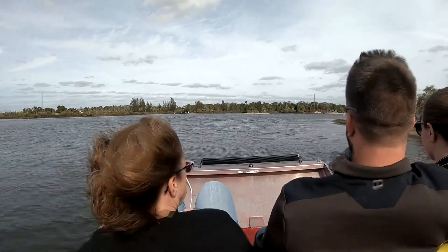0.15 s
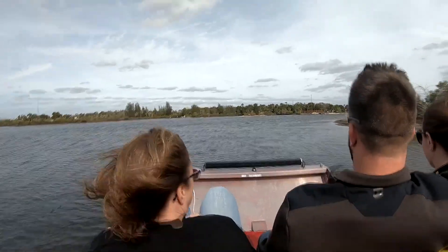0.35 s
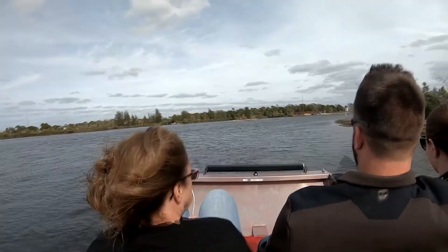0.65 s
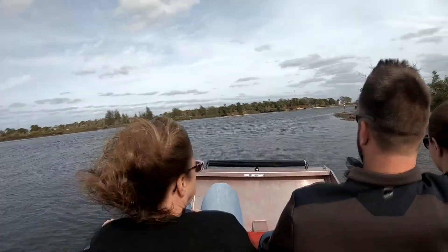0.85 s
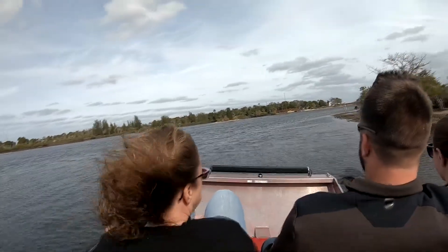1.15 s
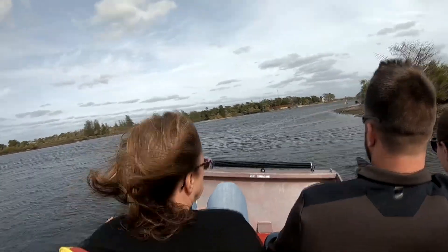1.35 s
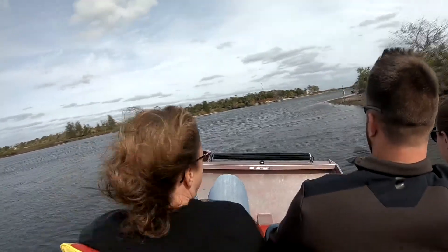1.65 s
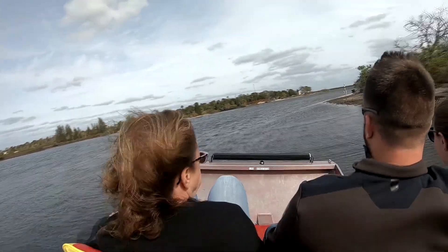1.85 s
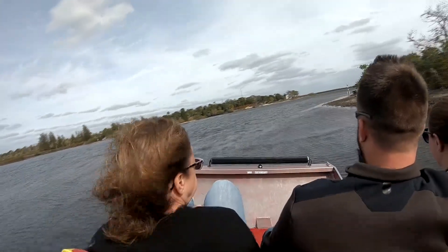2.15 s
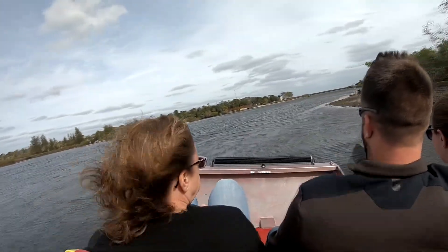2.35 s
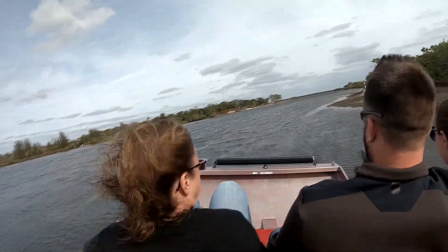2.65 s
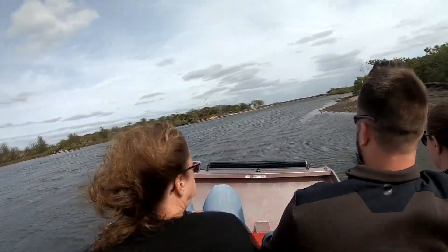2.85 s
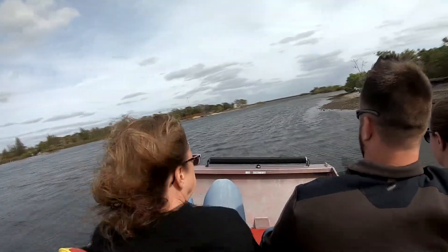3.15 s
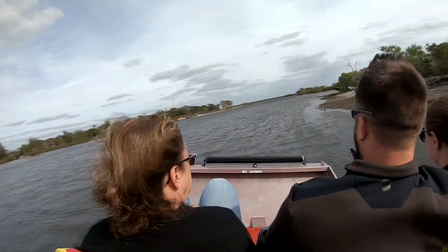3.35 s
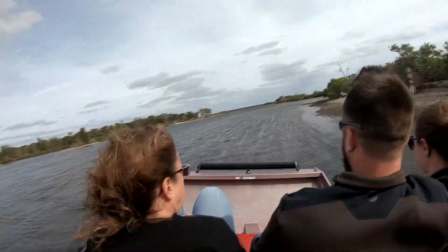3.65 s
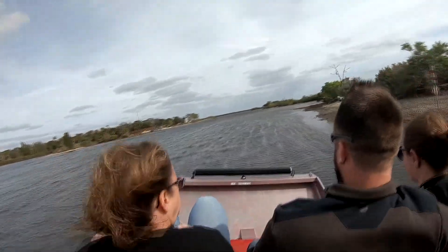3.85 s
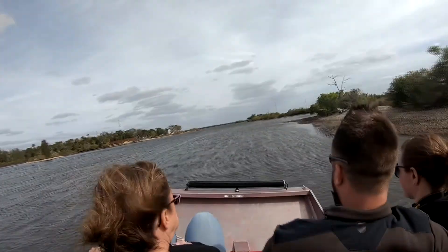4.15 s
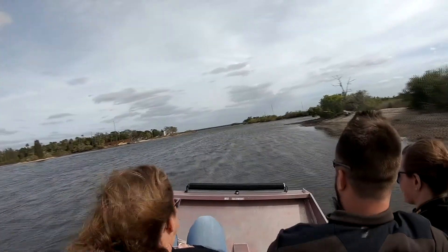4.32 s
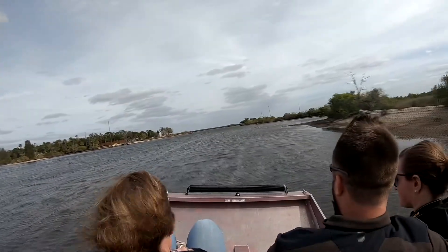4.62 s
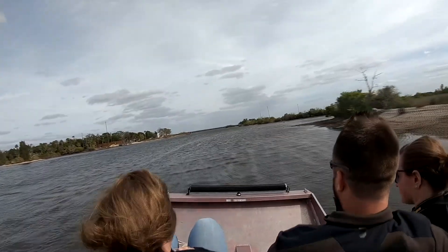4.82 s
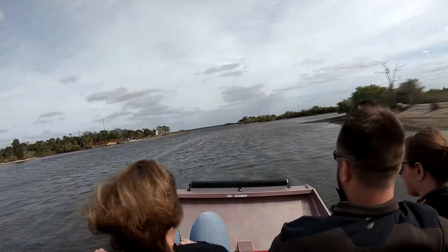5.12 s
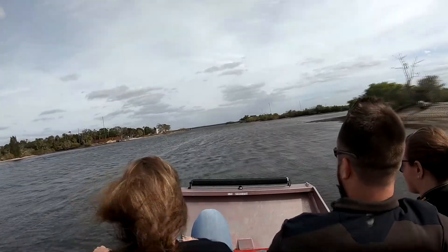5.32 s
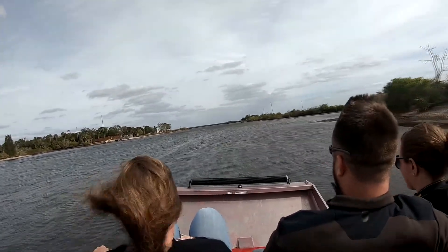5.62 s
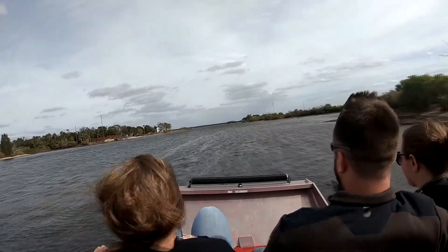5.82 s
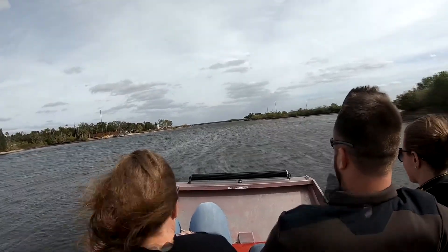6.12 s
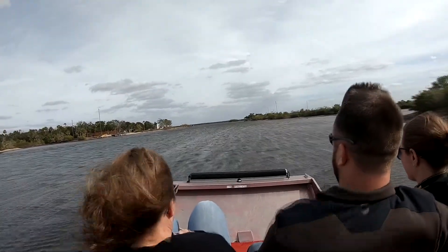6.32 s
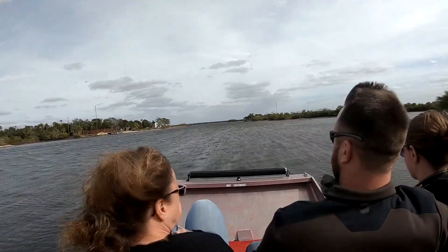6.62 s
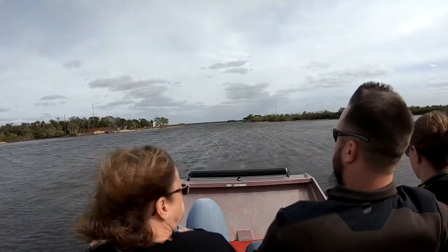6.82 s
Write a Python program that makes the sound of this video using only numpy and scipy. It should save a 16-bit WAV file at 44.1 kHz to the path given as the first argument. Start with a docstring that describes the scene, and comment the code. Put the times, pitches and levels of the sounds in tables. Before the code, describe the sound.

Aboard a moving airboat on open water, a loud, low propeller drone holds a nearly constant pitch, with a rough engine growl beating against it and a fast swishing hiss of air and spray. Wind thumps and crackles on the exposed microphone, heavy through the first four seconds, then mostly calmer, with a few late bursts.

```python
"""An airboat's propeller drones over open water, a periodic pulse train whose hiss swishes at each blade pass.
The V8 that drives it through a reduction adds a comb of exhaust lines that beats against the drone,
a faint accessory whine and a growl. Torn air and spray add a low roar and a hiss of shaped noise.
Head wind at the microphone is noise in three bands for three sizes of eddy, with gusts and short slaps.
A limiter ducks the hardest buffets."""
import sys
import numpy as np
from scipy import signal
from scipy.fft import rfft, irfft, next_fast_len
from scipy.io import wavfile
from scipy.ndimage import uniform_filter1d, minimum_filter1d

SR = 44100
rng = np.random.default_rng(int(sys.argv[2]) if len(sys.argv) > 2 else 0)


def digitize_waveform(pressure):
    """Quantize a signal to 16-bit integers and store it at the path in sys.argv[1].

    Rows of a 2-D input are taken as channels; values are limited to [-1, 1].
    """
    field = np.atleast_2d(pressure).T
    bounded = np.clip(field, -1, 1)
    quanta = np.round(bounded * 32767).astype(np.int16)
    wavfile.write(sys.argv[1], SR, quanta)


N = 307818
TIME = np.arange(N) / SR  # s

# speed of the propeller: start_s, blade_passes_hz
BLADE_RATE = [(0, 88.54), (0.5, 89), (0.9, 88.88), (1.2, 88.5), (1.55, 89.23), (1.9, 88.4), (2.25, 88.47),
              (2.7, 88.53), (3.15, 88.63), (3.55, 88.48), (4.2, 88.75), (4.65, 88.38), (5.2, 88.5),
              (5.55, 88.26), (6, 88.83), (6.5, 88.98), (6.9, 89.1)]
# head wind at the microphone: start_s, strength_db, brightness_db
HEAD_WIND = [(0, -22, -0.5), (.6, -20.5, 0), (.7, -28.5, -2), (.85, -24.5, -1.5), (1.5, -26, 1),
             (2.15, -25, 3), (2.28, -31, -3.5), (2.95, -30, -0.5), (3.3, -25, 1), (3.6, -24.5, 2.3),
             (3.95, -23, .5), (4.05, -37, 6), (4.85, -35, 1.5), (5.35, -30.5, 2.5), (6.33, -35, 3),
             (6.52, -22.5, -4.5), (6.98, -25.5, -4.5)]
CYCLES_PER_BLADE = .38185  # four-stroke engine cycles per blade pass, set by the reduction


def undb(db):
    """Decibels to amplitude ratio: 20 dB a decade."""
    return 10 ** (np.asarray(db) / 20)


def unit(x):
    """Normalise a signal to a standard deviation of 1."""
    return x / np.std(x)


def curves(table):
    """Linear interpolation in time of each column of a table after the first."""
    s, *columns = np.transpose(table)
    return [np.interp(TIME, s, column) for column in columns]


def walk(rate):
    """Low-passed random steps: a smooth chance curve of spread 1 that changes about rate times a second."""
    hold = max(int(SR / rate), 2)
    steps = np.repeat(rng.standard_normal(N // hold + 2), hold)
    smooth = uniform_filter1d(uniform_filter1d(steps, hold), hold)
    return unit(smooth[:N])


def noise(colour):
    """Spectral shaping of white noise to rms 1; colour lists hz, level_db, joined along log frequency."""
    hz, db = np.transpose(colour)
    size = next_fast_len(N)
    f = np.maximum(np.fft.rfftfreq(size, 1 / SR), 1)
    gain = undb(np.interp(np.log(f), np.log(hz), db))
    gain *= np.minimum(f / hz[0], 1) ** 2 * np.minimum(hz[-1] / f, 1) ** 8  # skirts beyond the end points
    shaped = irfft(rfft(rng.standard_normal(size)) * gain, size)
    return unit(shaped[:N])


def split(x, hz, order=2):
    """Complementary filtering: a zero-phase low-pass part and the remainder above it."""
    low = signal.sosfiltfilt(signal.butter(order, hz, fs=SR, output="sos"), x)
    return low, x - low


def eddies(rate, depth_db):
    """Turbulent amplitude modulation: a gain of rms 1 that flickers in decibels within bounds."""
    gain = undb(depth_db * np.tanh(.7 * walk(rate)))
    return gain / np.sqrt(np.mean(gain ** 2))


def tone(phase, waver_db, smear):
    """Propagation through turbulent air: a line of rms about 1, fluttering in level and phase (smear in rad)."""
    flutter = undb(waver_db * walk(11))
    return -np.sqrt(2) * flutter * np.cos(phase + smear * walk(13))


def airflow():
    """Superposition of energy: bell-shaped gusts add to the head wind for large, middling and small eddies."""
    # gusts that stand out of the wind: peak_s, length_s (standard deviation), strength_db,
    # brightness_db and rumble_db (small and large eddies relative to the strength)
    gust_rows = [(.15, 0.053, -26, -15, 0), (0.58, 0.048, -21.5, -7, 2), (1.009, 0.023, -17.5, -2, 0),
                 (1.268, 0.013, -19, 0, -1), (1.365, 0.024, -23, 6.5, 1), (1.814, 0.025, -25.5, 1, 4),
                 (1.95, 0.028, -24.5, 3, 2), (2.048, 0.039, -20, -6, -3), (2.437, .02, -22, 0.5, 2),
                 (2.686, 0.033, -19.5, -1.5, -1), (3.41, .03, -21.5, -1, 4), (3.785, .03, -21, -0.5, 5.5),
                 (3.847, 0.021, -25, 5.5, 5), (4.609, 0.023, -25.5, -3.5, 3), (5.445, .03, -19.5, -7, 2),
                 (5.61, 0.024, -25.5, -3, 4), (6.003, 0.02, -18, -1.5, -3), (6.122, .045, -22, -3, -11),
                 (6.5, 0.033, -17.5, -5.5, -6), (6.665, .02, -22, 0.5, -2)]
    unsteady_rate, unsteady_db = 18, 2.1  # the wind's own unsteadiness: changes per s, bound in dB
    wind_db, wind_bright_db = curves(HEAD_WIND)
    wind = undb(wind_db + unsteady_db * np.tanh(walk(unsteady_rate)))
    large, middling, small = wind, wind, wind * undb(wind_bright_db)
    for s, length, db, bright_db, rumble_db in gust_rows:
        swell = undb(db) * np.exp(-.5 * ((TIME - s) / length) ** 2)
        large = np.hypot(large, swell * undb(rumble_db))
        middling = np.hypot(middling, swell)
        small = np.hypot(small, swell * undb(bright_db))
    return large, middling, small


def gusts():
    """Turbulent pressure at the microphone: large eddies rumble, middling ones buffet, small ones flutter."""
    rumble_db, buffet_db, flutter_db = -1, 4, -6  # each against its eddies' strength
    large, middling, small = airflow()

    rumble = noise([(22, -19), (35, -7.0), (58, -0.5), (80, 2), (120, -16), (200, -38.5)])
    rumble = rumble * eddies(rate=16, depth_db=2.5)

    buffet = noise([(60, -26.0), (110, 3.5), (220, 1), (330, -5.5), (450, -13.5), (700, -29.5)])
    buffet = buffet * eddies(rate=25, depth_db=2.5)

    flutter = noise([(200, -10.5), (480, 2), (900, 0.0), (1400, -9.0), (2200, -14.5), (4000, -25.0),
                     (6300, -28.5)])
    ragged = eddies(rate=150, depth_db=6.0)
    # the flow tears at the port, so flutter outgrows the wind: 0.15 dB extra per dB above a -23 dB pivot
    tearing = (middling / undb(-23)) ** 0.15
    flutter = small * tearing * ragged * flutter

    return undb(rumble_db) * large * rumble + undb(buffet_db) * middling * buffet + undb(flutter_db) * flutter


def small_slaps():
    """Random arrivals: lesser eddies, one by chance in each equal interval, as hard as the wind is strong
    and bright; rows of peak_s, strength_db, length_s, crackle_db."""
    per_s, offset_db, scatter_db = 10, -3, 1.5  # level against the wind's strength and brightness
    wind_db, bright_db = curves(HEAD_WIND)
    count = int(per_s * N / SR)
    when, size = rng.random((count, 2)).T
    at = ((np.arange(count) + when) / count * (N - 1)).astype(int)
    db = wind_db[at] + bright_db[at] + offset_db + scatter_db * (2 * size - 1)
    return [(s, d, .005, -13) for s, d in zip(TIME[at], db)]


def slaps():
    """Impulsive loading: single eddies sweep over the microphone, a dull thud with a crackle on top."""
    # the hardest eddies: peak_s, strength_db, length_s, crackle_db (relative to the strength)
    hard_slaps = [(.024, -20.5, 0.0045, -3.5), (0.042, -23.5, 0.0073, -2.5), (0.112, -21.5, 0.0069, -12),
                  (0.228, -20, 0.0046, -12), (.257, -21.5, 0.0023, -0.5), (.333, -16, 0.0043, -9),
                  (0.365, -24.5, 0.0082, -6), (0.506, -17, 0.0049, -10), (.539, -15.5, 0.0044, -13),
                  (0.598, -23, 0.007, -13), (.83, -21.5, 0.0061, -10), (1.004, -24, .012, -8),
                  (1.17, -17, .005, -12), (1.187, -18, .005, -5), (1.412, -24, 0.0054, -1.5),
                  (1.598, -19.5, 0.0084, -11), (1.792, -21.5, .008, -11), (1.93, -24.5, .009, -4),
                  (2.474, -19, 0.0062, -11), (2.577, -16.5, 0.006, -20), (2.683, -20.5, .01, -20),
                  (2.742, -21, 0.01, -20), (3.415, -16.5, .0076, -14), (3.484, -20, .008, -7),
                  (3.508, -20.5, .009, -16), (3.602, -23.5, 0.012, -6.5), (3.64, -19, 0.014, -11.5),
                  (3.784, -24, 0.015, -10), (3.851, -24, 0.013, -12), (6.014, -17, .005, -17),
                  (6.657, -19, 0.0095, -30)]
    attack_share = .7  # the rise of a slap against its length
    thud = noise([(90, -10.0), (300, 4), (900, -4), (1500, -7.5), (2500, -33.5), (5000, -42.5)])
    fizz = noise([(800, -7), (2000, 2.5), (3500, -5.5), (6000, -11.5), (7500, -35.0)])
    force, crackle = np.zeros(N), np.zeros(N)
    for s, db, length, crackle_db in [*hard_slaps, *small_slaps()]:
        near = slice(max(int((s - 2 * length) * SR), 0), int((s + 3 * length) * SR))
        age = (TIME[near] - s) / length
        swell = undb(db) * np.exp(-(age / np.where(age < 0, attack_share, 1)) ** 2)
        force[near] += swell
        crackle[near] += swell * undb(crackle_db)
    return undb(0.5) * force * thud + undb(0.4) * crackle * fizz


def rush(blade):
    """Broadband flow noise of torn air and spray: a low roar, and a hiss modulated once per blade pass."""
    # hiss and spray: start_s, level_db, treble_db (the spray above 7 kHz, on top of the level)
    rush_levels = [(0, -3, -3.5), (.7, -4, -4), (1.05, 1.5, -4), (1.3, -1.5, -4), (1.9, -0.5, -3),
                   (2.7, 0.5, 2.5), (3.1, -0.1, 0.5), (3.45, 1.5, 1), (3.9, -4.5, -1.5), (4.15, -1, -3.5),
                   (4.5, -0.4, 1.5), (5.05, -1, 4.5), (5.45, -1, 6.5), (5.9, 0, 3.5), (6.25, -2, 2.5),
                   (6.6, .7, 0.5), (6.98, 1, 2)]
    # spectrum of the rush: hz, level_db
    rush_colour = [(30, -7), (120, 0), (210, 2.5), (330, -4.5), (500, -10.5), (900, -17), (1400, -22.5),
                   (2200, -22.5), (3000, -24.5), (3500, -20.5), (4300, -26), (5400, -26), (6300, -24.5),
                   (7000, -32), (8000, -42), (10000, -56.5)]
    level_db, treble_db = curves(rush_levels)
    roar, hiss = split(noise(rush_colour), hz=3320)
    hiss, top = split(hiss, hz=7000, order=4)

    blade_pulse = np.exp(5.8 * (np.cos(blade) - 1))  # peaks at 1 as each blade passes
    swish = 1 + blade_pulse * eddies(rate=90, depth_db=9.5)
    swish = swish / np.sqrt(np.mean(swish ** 2))

    spray = top * undb(treble_db) * eddies(rate=24, depth_db=3)
    roar = undb(-25.0) * roar * eddies(rate=14, depth_db=2.5)
    return roar + undb(level_db - 24.5) * (hiss * swish + spray)


def growl(cycle):
    """Periodicity gives harmonics: valves and pistons make the same rough rattle in every engine cycle."""
    # spectrum of the growl: hz, line_level_db
    growl_colour = [(100, -42), (340, -44), (500, -52), (900, -53), (1150, -57.5), (1400, -59), (2000, -64),
                    (3000, -71.5)]
    size = 2048  # samples of one cycle
    order = np.arange(1, 90)
    hz, db = np.transpose(growl_colour)
    line_hz = order * CYCLES_PER_BLADE * BLADE_RATE[0][1]  # at the starting speed
    random_phase = np.exp(2j * np.pi * rng.random(len(order)))
    lines = undb(np.interp(np.log(line_hz), np.log(hz), db)) * random_phase
    rattle = irfft(np.r_[0, lines], size) * size / np.sqrt(2)
    repeated = np.interp(cycle / (2 * np.pi), np.arange(size) / size, rattle, period=1)
    return repeated * undb(1.6 * walk(9))


def engine(cycle, firing_db):
    """Harmonics of the four-stroke cycle: eight unequal firings give a comb of exhaust lines; a driven
    accessory whines above them."""
    # exhaust lines: multiple of the engine cycle, relative_db
    exhaust_lines = [(3, -19), (4, -14), (5, 2.5), (6, -2.5), (7, -18), (8, 1.5), (9, -19), (10, -28),
                     (11, -25.5), (12, -25), (14, -29.5), (15, -27.5), (16, -11), (17, -26), (19, -19.5),
                     (20, -29), (22, -27), (24, -22.5), (26, -30.5), (27, -18.5), (30, -31), (34, -34.5),
                     (38, -26.5), (40, -25.5), (43, -30), (48, -37.5), (53, -32.5), (56, -40), (60, -43)]
    # whine of the accessory: start_s, level_db
    whine_levels = [(0, -62.5), (2, -56), (2.3, -52), (2.8, -56), (3.6, -55.5), (4, -54), (4.35, -45),
                    (4.7, -48.5), (5.1, -42), (5.5, -48), (6, -45.5), (6.4, -52), (6.98, -50)]
    firings, whine_order = 8, 96  # per engine cycle
    exhaust = 0
    for k, db in exhaust_lines:
        if k == firings:
            line = undb(db + firing_db + 0.64) * tone(k * cycle, waver_db=1.4, smear=0.11)
        else:
            line = undb(db - 30) * tone(k * cycle, waver_db=2.5, smear=.22)
        exhaust = exhaust + line

    whine_db = curves(whine_levels)[0]
    whine = undb(whine_db) * tone(whine_order * cycle, waver_db=1.5, smear=.4)
    # the growl swells with the whine, 0.25 dB per dB, and is unchanged at a whine of -53 dB
    growl_gain = undb(.25 * (whine_db + 53))
    return exhaust + whine + growl_gain * growl(cycle)


def propeller(blade, first_db, octave_db):
    """Harmonics of a periodic suction pulse at each blade pass: two strong tones and weak overtones."""
    # overtones of the blade pass: multiple, relative_db
    overtone_rows = [(3, -35), (4, -34), (5, -22.5), (6, -35.5), (7, -33.5), (8, -43.5), (9, -41),
                     (10, -44), (11, -46.5), (12, -51)]
    first = undb(first_db + 0.6) * tone(blade, waver_db=0.84, smear=0.039)
    octave = undb(octave_db + 1.5) * tone(2 * blade, waver_db=0.3, smear=0.093)
    overtones = sum(undb(db) * tone(k * blade, waver_db=1.4, smear=0.13) for k, db in overtone_rows)
    return first + octave + undb(-16.0) * overtones


def scene():
    """Phase locking: one shaft speed turns both the engine and the propeller; the sources add linearly."""
    # the three strong tones before trims: start_s, blade_pass_db, octave_db, firing_db
    drone_levels = [(0, -20, -19, -22), (.15, -25, -19, -30), (.62, -21.5, -16.5, -22.5),
                    (.87, -19, -16, -26), (1.35, -19, -17, -26), (1.72, -20, -13, -28),
                    (2.07, -20, -16, -29.5), (2.45, -20.5, -11, -26.5), (2.8, -19.5, -17, -25.5),
                    (3.08, -21.5, -12, -29), (3.42, -19, -17.5, -33), (3.9, -20.5, -18.5, -30.5),
                    (4.35, -17, -13, -28), (5.3, -16.5, -15.5, -23), (5.56, -19.5, -19, -34.5),
                    (5.92, -18, -14.5, -26), (6.1, -19.5, -18.5, -28.5), (6.98, -21, -16, -25)]
    blade = 2 * np.pi * np.cumsum(curves(BLADE_RATE)[0]) / SR  # phase in rad, one turn per blade pass
    first_db, octave_db, firing_db = curves(drone_levels)
    boat = propeller(blade, first_db, octave_db) + engine(CYCLES_PER_BLADE * blade, firing_db) + rush(blade)
    return (boat + gusts() + slaps())[None]


def record(dry):
    """Gain reduction by peak level: a soft, fast limiter ducks everything under the hardest buffets."""
    window = 500  # samples
    peak = -minimum_filter1d(-np.abs(dry), window)
    gain = (1 + (peak / undb(-1.8)) ** 6) ** (-1 / 6)
    gain = uniform_filter1d(gain, window)
    fade = np.minimum(TIME / .003, 1)  # 3 ms fade-in
    top_cut = signal.ellip(8, .2, 70, 12000, fs=SR, output="sos")  # low-pass at 12 kHz
    return signal.sosfilt(top_cut, dry * gain * fade * undb(0.3))


dry = scene()
out = record(dry)
digitize_waveform(out)
```